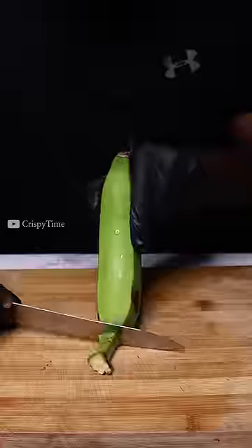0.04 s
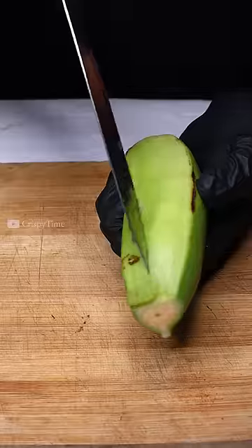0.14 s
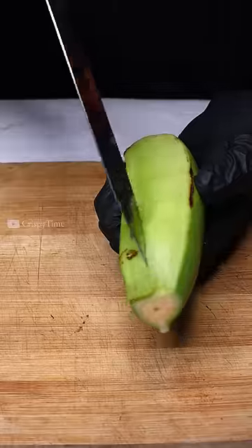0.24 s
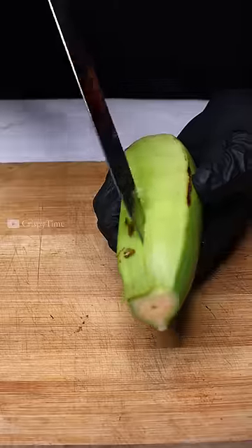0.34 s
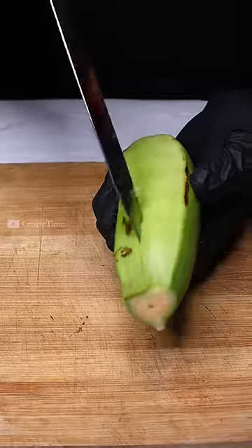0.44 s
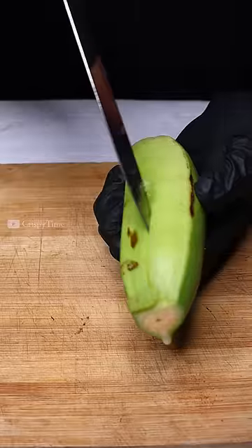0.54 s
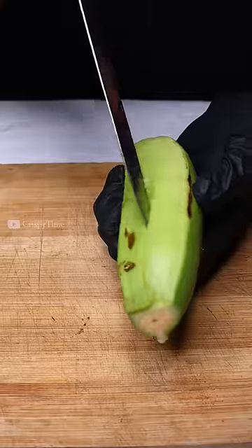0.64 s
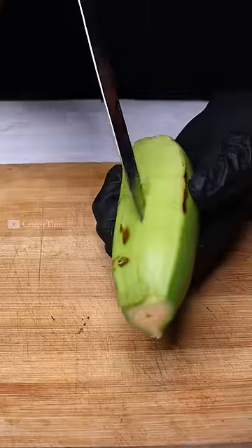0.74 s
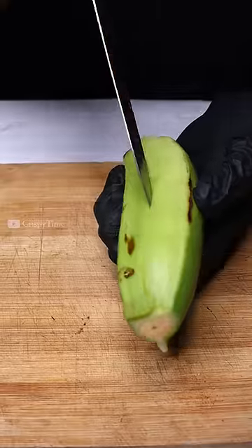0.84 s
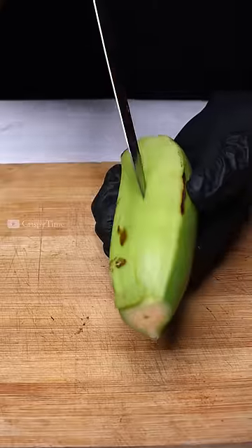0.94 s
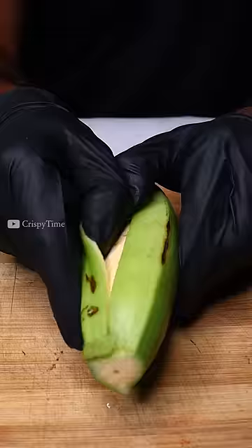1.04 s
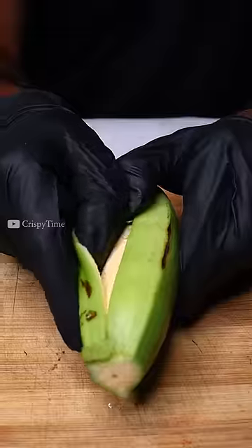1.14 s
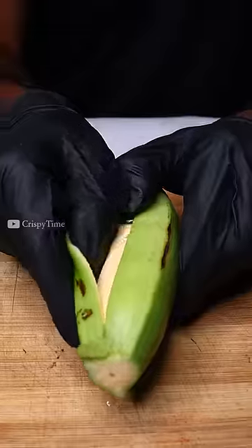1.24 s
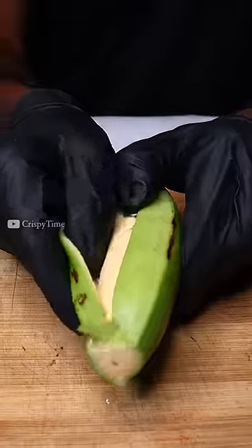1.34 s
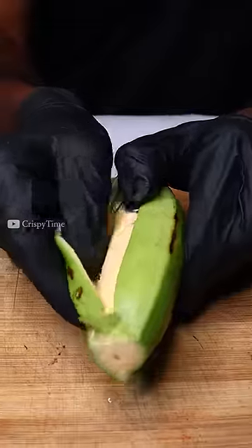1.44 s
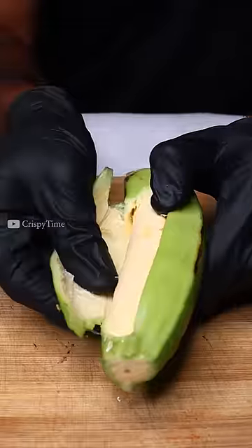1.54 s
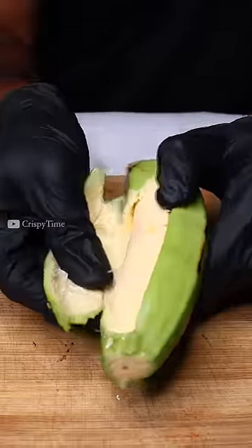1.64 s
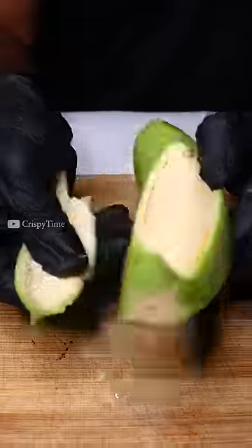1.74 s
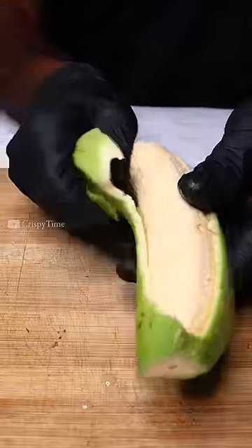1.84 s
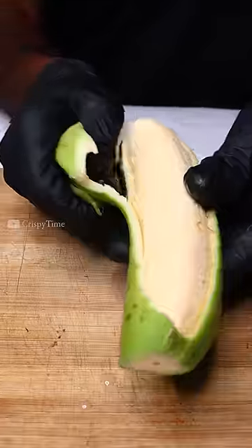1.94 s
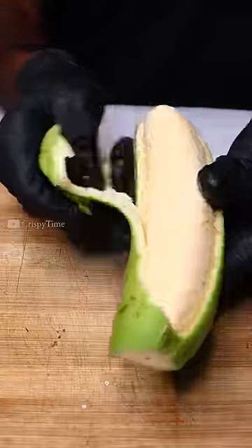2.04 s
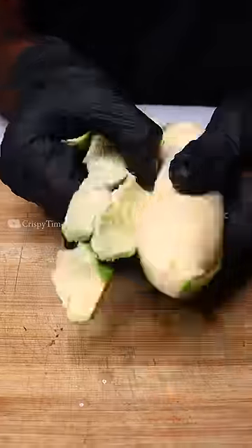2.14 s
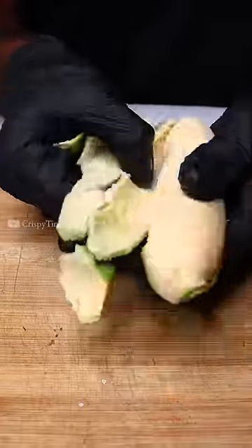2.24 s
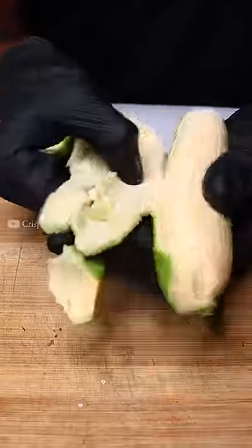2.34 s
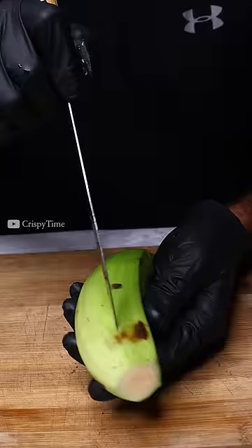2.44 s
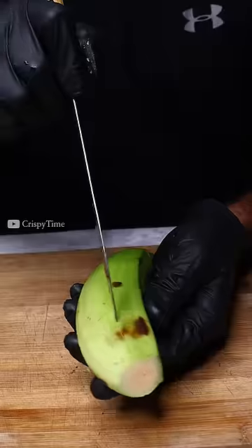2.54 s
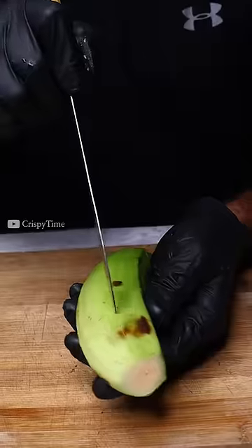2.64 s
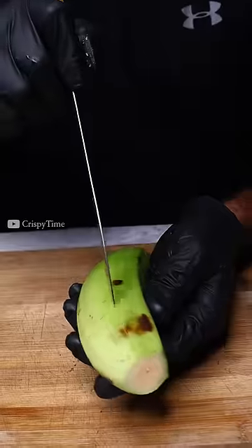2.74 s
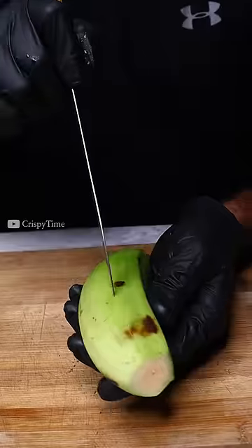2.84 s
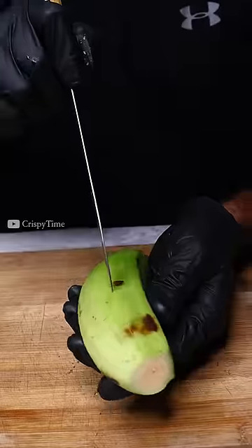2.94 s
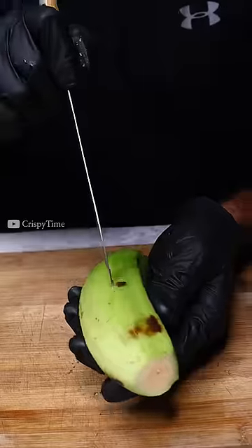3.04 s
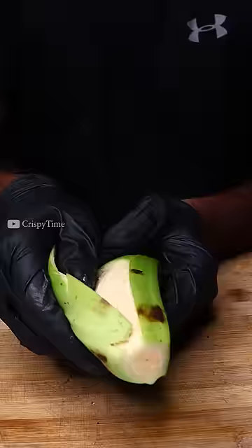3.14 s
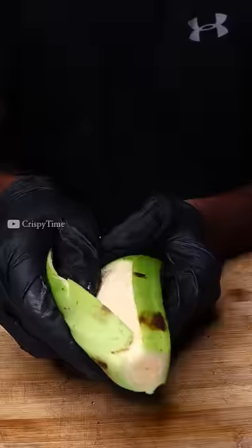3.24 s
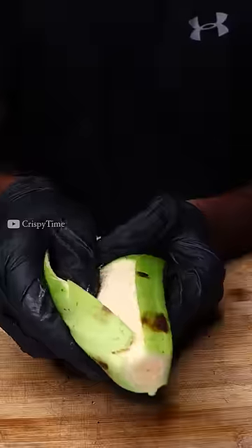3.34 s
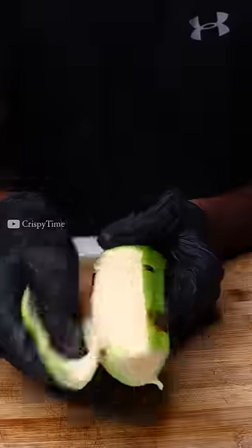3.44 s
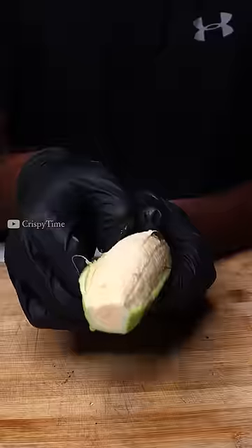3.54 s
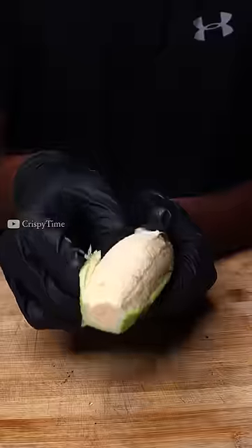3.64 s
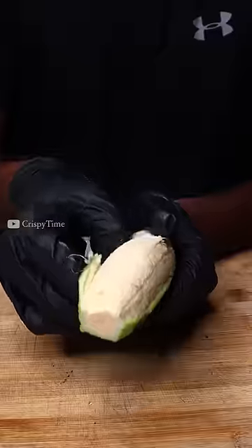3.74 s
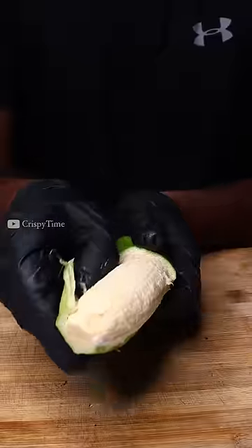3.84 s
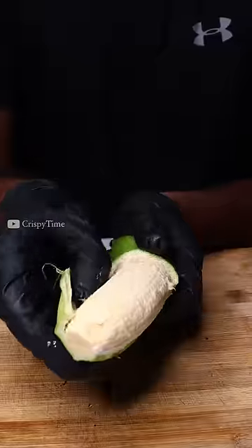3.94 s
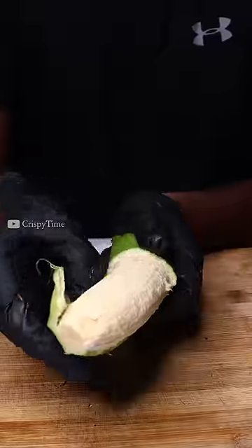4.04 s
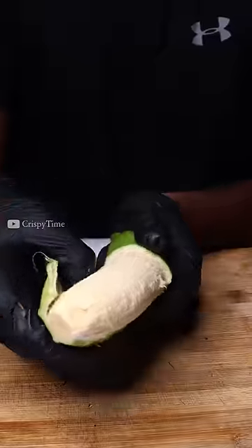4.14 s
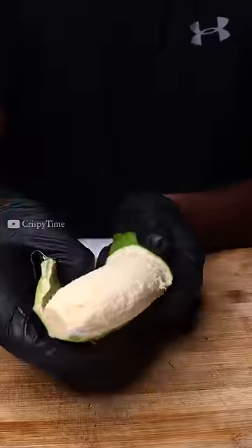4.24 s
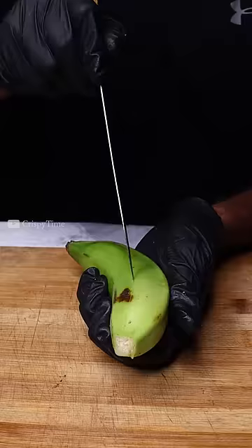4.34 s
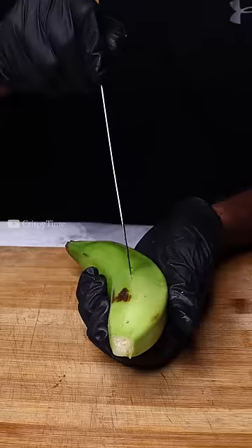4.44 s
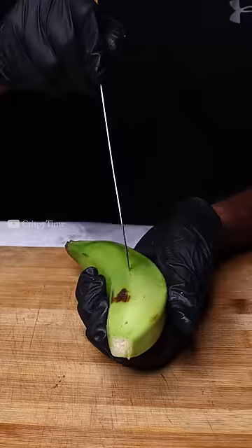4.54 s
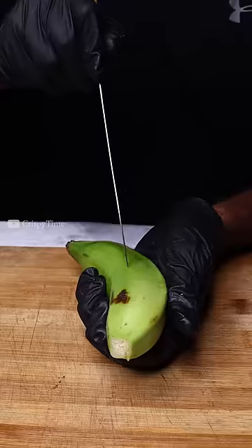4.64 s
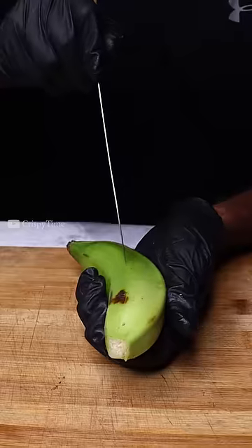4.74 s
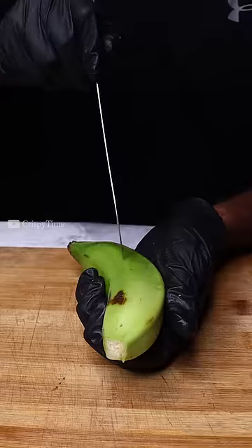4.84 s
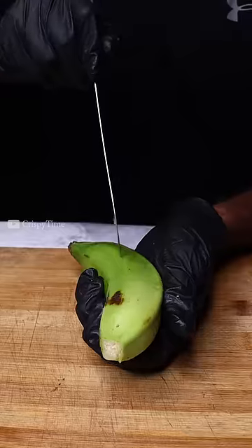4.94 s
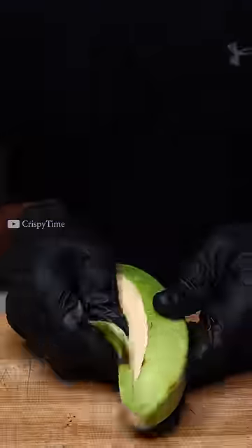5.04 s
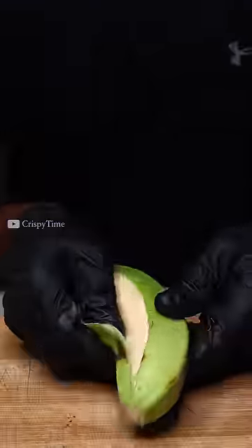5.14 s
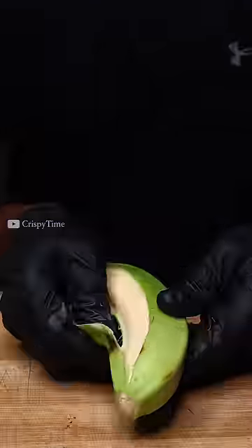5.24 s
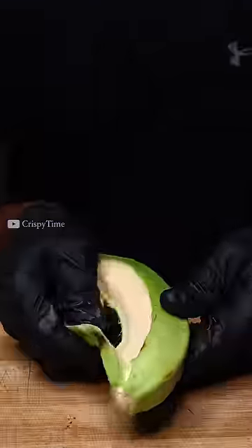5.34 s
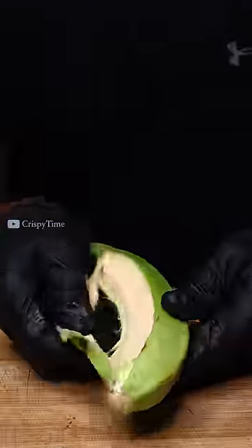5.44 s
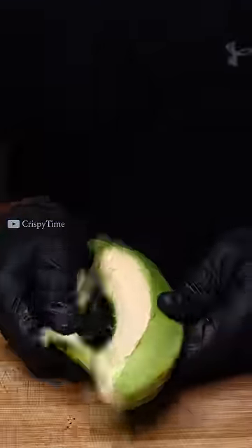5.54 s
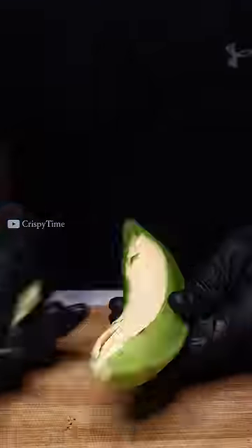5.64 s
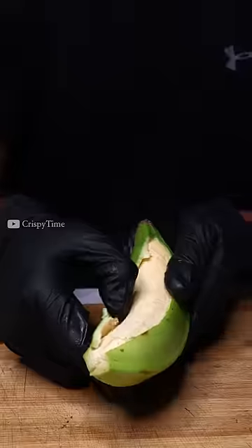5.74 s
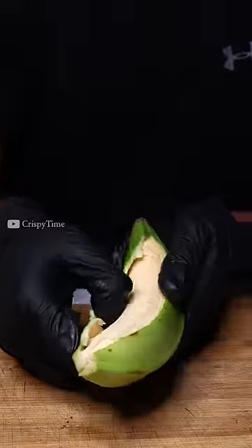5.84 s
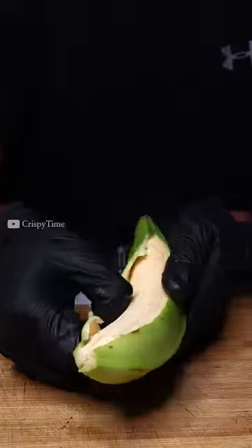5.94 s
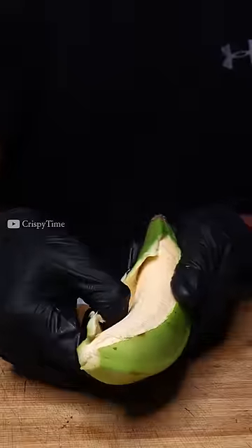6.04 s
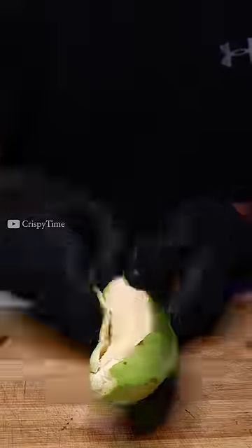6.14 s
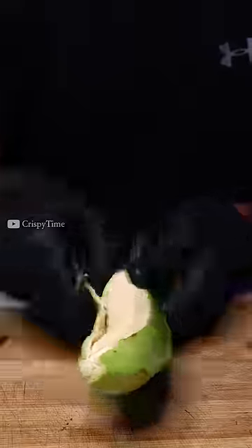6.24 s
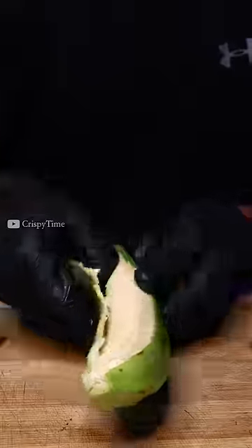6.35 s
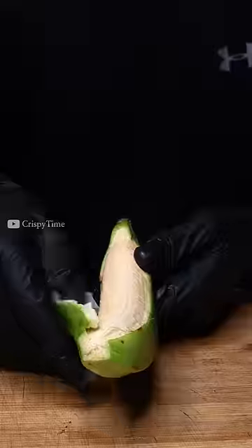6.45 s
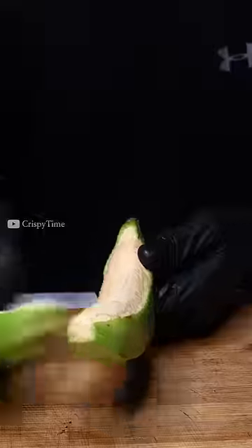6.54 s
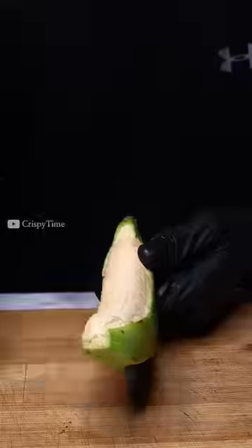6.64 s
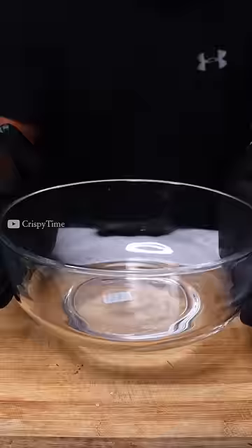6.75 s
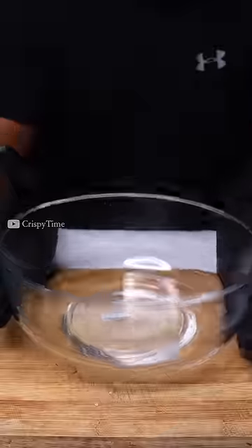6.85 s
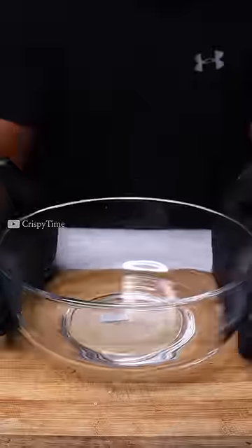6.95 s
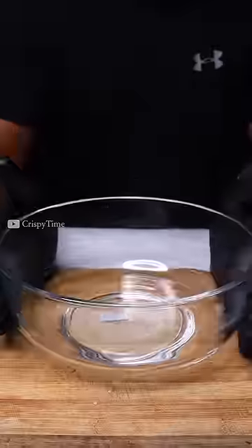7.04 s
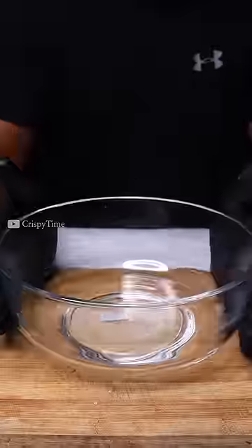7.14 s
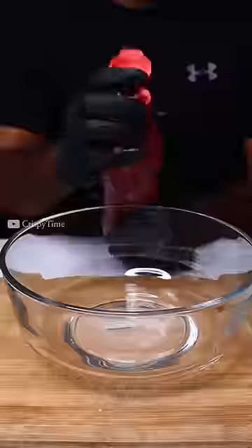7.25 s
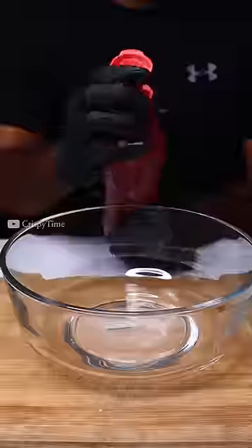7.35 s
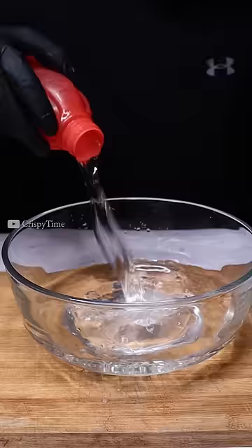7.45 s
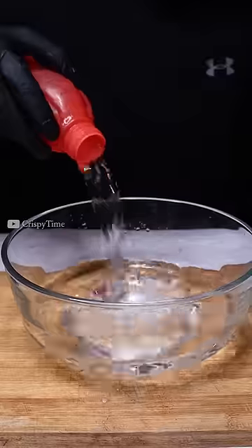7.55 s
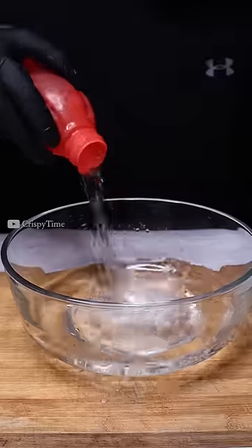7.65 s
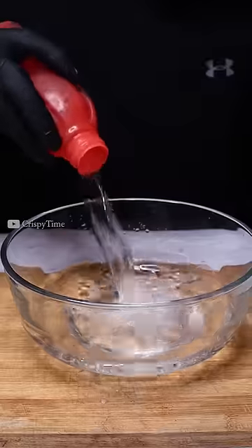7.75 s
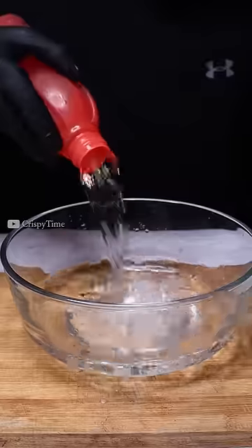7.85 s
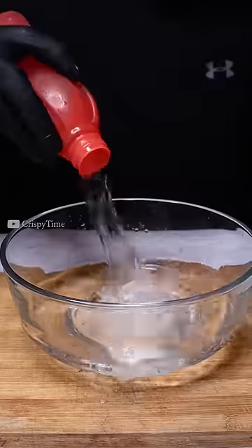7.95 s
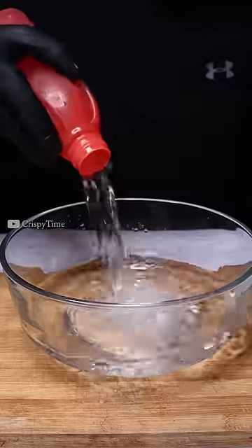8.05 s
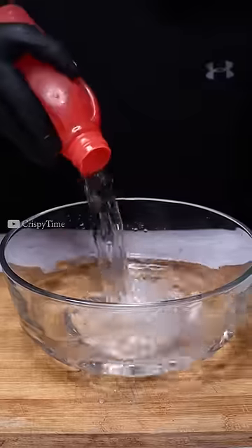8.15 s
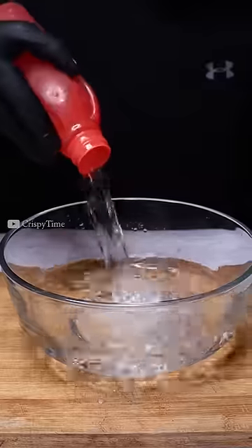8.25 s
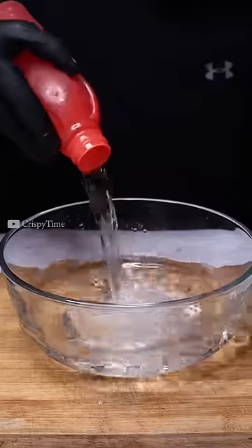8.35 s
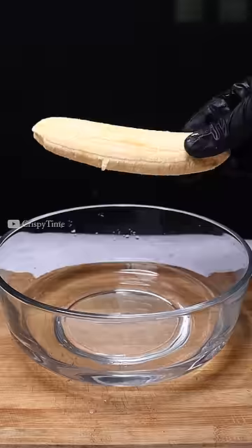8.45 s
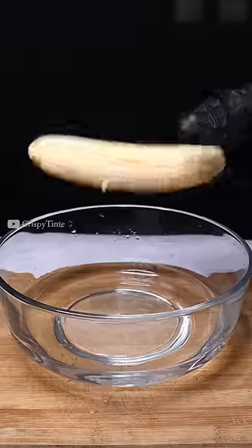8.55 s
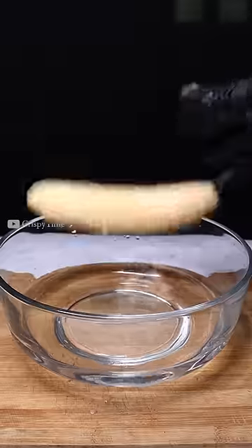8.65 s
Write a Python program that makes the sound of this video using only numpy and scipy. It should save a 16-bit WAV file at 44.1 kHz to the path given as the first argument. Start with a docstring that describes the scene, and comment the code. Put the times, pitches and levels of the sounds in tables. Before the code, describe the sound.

One loud chop, a squeaky blade and crisp tearing of banana skin, then a glass bowl set down and water poured in.

```python
"""One chop lands on a wooden board in a small kitchen. Gloved hands then slit green bananas three times, the
blade dragging and squeaking, and after each slit pull off the skin, which crackles and snaps. At 3.2 s the
knife tip pops out. Near 7 s a glass bowl is set on the board, a bottle cap pops, and water is poured,
splashing, bubbling and ringing the glass. The sound comes in short stretches, and each one stops abruptly, echo
and all."""
import sys
import numpy as np
from scipy import signal
from scipy.fft import rfft, irfft
from scipy.io import wavfile
from scipy.ndimage import uniform_filter1d

SR = 44100
rng = np.random.default_rng(int(sys.argv[2]) if len(sys.argv) > 2 else 0)


def master_out(mix):
    """Clip the mix to full scale and print it as 16-bit PCM to the path in sys.argv[1]."""
    frames = np.transpose(np.atleast_2d(mix))
    ceiling = np.clip(frames, -1, 1)
    pcm = np.round(ceiling * 32767).astype(np.int16)
    wavfile.write(sys.argv[1], SR, pcm)


N = 383229
TIME = np.arange(N) / SR


def gain_of(db):
    """Turns decibels into a factor to multiply by."""
    return 10 ** (np.asarray(db) / 20)


def unit_power(x):
    """Scales a sound to an average power of 1."""
    return x / np.sqrt(np.mean(x ** 2) + 1e-20)


def value_at(points, hz):
    """Looks up a value between rows of (Hz, value), on a log-frequency axis."""
    known_hz, value = np.transpose(points)
    return np.interp(np.log(hz + 1), np.log(known_hz + 1), value)


def add(mix, s, sound):
    """Mixes a sound in at s seconds."""
    part = mix[round(s * SR):][:len(sound)]
    part += sound[:len(part)]


def click(colour, lo_hz=10, hi_hz=20000):
    """A sharp click with the given tone colour, fading below lo_hz and above hi_hz."""
    hz = abs(np.fft.fftfreq(4096, 1 / SR)) + 1
    edges = np.sqrt((1 + (lo_hz / hz) ** 8) * (1 + (hz / hi_hz) ** 12))
    log_gain = np.log(gain_of(value_at(colour, hz)) / edges + 1e-6)
    phase = -signal.hilbert(log_gain).imag  # packs the energy at the start
    taps = np.fft.ifft(np.exp(log_gain + 1j * phase)).real[:2048]
    return taps / np.linalg.norm(taps)


def level_curve(times, db):
    """A gain that passes through the given levels and is silent outside them."""
    return gain_of(np.interp(TIME, times, db)) * (TIME > times[0] - .004) * (TIME < times[-1] + .004)


def swells(rows, rise_s, fall_s):
    """A gain that climbs to each peak (seconds, dB) and dies away after it."""
    out, t = np.zeros(N), np.arange(-SR // 8, SR // 3) / SR
    shape = np.exp(np.where(t < 0, t / rise_s, -t / fall_s))
    for s, db in rows:
        add(out, s + t[0], gain_of(db) * shape)
    return out


def grains(per_s, spread_db):
    """Tiny clicks at random moments; a few are large."""
    sizes = gain_of(spread_db * np.minimum(rng.exponential(1, N), 4))
    return unit_power(sizes * rng.standard_normal(N) * (rng.random(N) < per_s / SR))


def ring(hz, t60, glide=0., size=SR // 2):
    """A tone that may slide in pitch; its ring time t60 is the seconds it takes to fall 60 dB."""
    t = np.arange(size) / SR
    return gain_of(-60 * t / t60) * np.sin(2 * np.pi * hz * (t + glide * t ** 2 / t60))


def resonate(x, peaks):
    """Lets a sound ring an object's notes, each given as (Hz, width in Hz, dB)."""
    return sum(gain_of(db) * signal.lfilter(*signal.iirpeak(hz, hz / width, SR), x)
               for hz, width, db in peaks)


def moving_resonance(x, hz, width_hz):
    """A resonance that follows the pitch curve hz: shift down, smooth, shift back."""
    turn = np.exp(2j * np.pi * np.cumsum(hz) / SR)
    keep = np.exp(-np.pi * width_hz / SR)
    return 2 * (turn * signal.lfilter([1 - keep], [1, -keep], x / turn)).real


def squeeze(x, knee_db, hold_s):
    """Turns down whatever is louder than knee_db, so a blow's echo stands out more."""
    keep = np.exp(-1 / (hold_s * SR))
    power_db = 10 * np.log10(signal.lfilter([1 - keep], [1, -keep], (x ** 2).mean(0)) + 1e-12)
    return x / gain_of(np.maximum(power_db - knee_db, 0))


# How alike the room sounds left and right. Each row: frequency in Hz, likeness from 0 to 1.
LIKENESS = [(60, 1), (400, 0.84), (1000, 0.64), (2400, 0), (8000, 0.22)]
def stereo_pair(spectra):
    """Blends two unrelated noises into left and right, most alike in the bass."""
    same = value_at(LIKENESS, np.linspace(0, SR / 2, spectra.shape[1]))[:, None]
    return np.array([spectra[0], same * spectra[0] + np.sqrt(1 - same ** 2) * spectra[1]])


# The tone colour of the quiet room. Each row: frequency in Hz, level in dB.
AIR_COLOUR = [(53, -44), (90, -9), (197, -12), (268, -6.5), (493, -13.5), (613, -12), (948, -15.5),
              (1990, -15.5), (2530, -20), (3290, -16), (14500, -26.5), (15400, -26), (16500, -45)]
def air():
    """The quiet hiss and rumble of the kitchen."""
    hz, _, noise = signal.stft(rng.standard_normal((2, N)), SR, nperseg=2048)
    coloured = stereo_pair(noise) * gain_of(value_at(AIR_COLOUR, hz))[:, None]
    return gain_of(-56.5) * unit_power(signal.istft(coloured, SR)[1][:, :N])


# Bumps of the counter. Each row: time in seconds, level in dB.
BUMPS = [(.62, -56), (1.41, -53), (1.77, -44), (2.12, -70), (2.77, -63), (3.47, -46), (3.71, -55),
         (3.92, -55), (4.6, -61), (4.9, -53), (5.14, -55), (5.7, -45.5), (6.38, -49), (7.65, -58),
         (7.95, -43), (8.2, -60.5)]
def counter_rumble():
    """Dull low noise carried by the counter, swelling at each bump."""
    band = signal.butter(3, [42, 150], "band", fs=SR, output="sos")
    level = gain_of(-68) + swells(BUMPS, rise_s=0.016, fall_s=0.032)
    return level * unit_power(signal.sosfilt(band, rng.standard_normal(N)))


# How long the kitchen echoes. Each row: frequency in Hz, ring time in seconds.
ECHO_TIMES = [(100, 0.56), (400, 0.38), (1000, 0.47), (2500, 0.42), (6000, 0.4), (14000, 0.24)]
def kitchen_echo(tail_db, right_delay):
    """Direct sound (right_delay samples later on the right), scatter off board and hands, then a tail."""
    hz, t, noise = signal.stft(rng.standard_normal((2, SR * 2 // 5)), SR, nperseg=256)
    decay = gain_of(-60 * t / value_at(ECHO_TIMES, hz)[:, None])
    tail = signal.istft(stereo_pair(noise) * decay, SR, nperseg=256)[1]
    age = np.arange(tail.shape[1]) / SR
    scatter = tail * np.exp(-age / 0.0011) * (age > .0002)
    tail *= 1 - np.exp(-age / 0.0018)
    echo = gain_of(tail_db) * tail / np.linalg.norm(tail[0])
    echo += gain_of(1.5) * scatter / np.linalg.norm(scatter[0])
    echo[[0, 1], [0, right_delay]] += 1
    return echo / np.linalg.norm(echo[0])


# The notes of the wooden board. Each row: pitch in Hz, level in dB, ring time in seconds.
BOARD_NOTES = [(104.2, -26.5, 0.71), (139, -28, 0.76), (198, -8, 0.76), (241.3, -7, 0.77),
               (324, -12.5, 0.42), (396, -13, 0.57), (562, -18, 0.56)]
# The tone colours of the chop, the bowl and the cap. Each row: frequency in Hz, level in dB.
CHOP_TONE = [(24, -57), (40, 1), (156, -17), (196, -2.5), (293, -7.5), (564, -2.5), (623, -12.5),
             (2090, -1.5), (4120, -7.5), (5580, -18.5), (14500, -28), (16500, -59)]
BOWL_TONE = [(24, -75), (40, -32.5), (239, -4.5), (285, -13.5), (550, -11), (672, -15), (1990, -16.5),
             (5440, -35), (16500, -99)]
CAP_TONE = [(59, -81), (100, -52), (186, -15.5), (684, -11), (1000, -3), (1510, -19), (3540, -17),
            (13600, -31), (15500, -33), (16500, -34.5)]
# The three blows. Each row: start in seconds, strength in dB, board ring in dB on top of that, colour.
BLOWS = [(0.0011, 54, -45, CHOP_TONE), (6.953, 34, -32.5, BOWL_TONE), (7.291, 14.7, -49.5, CAP_TONE)]
def blow(s, db, ring_db, colour, first, last):
    """A hard contact fills the kitchen while the board rings close by; heard from sample first to last."""
    contact, board = np.zeros(N), np.zeros(N)
    add(contact, s, gain_of(db) * click(colour, lo_hz=88))
    notes = sum(gain_of(note_db) * ring(hz, t60) for hz, note_db, t60 in BOARD_NOTES)
    add(board, s, gain_of(db + ring_db) * notes)
    echo = kitchen_echo(tail_db=10.5, right_delay=0)
    return signal.fftconvolve(contact[None, first:last], echo, axes=1)[:, :last - first] + board[first:last]


# The strength of the stream. Each row: time in seconds, level in dB.
FLOW = [(7.488, -36.5), (7.554, -44.5), (7.57, -35.5), (7.602, -37.5), (7.634, -29.5), (7.804, -40),
        (7.948, -34), (8.026, -39.5), (8.034, -34), (8.178, -38.5), (8.228, -33), (8.254, -37), (8.37, -36),
        (8.452, -39.5)]
# The tone colour of the splash. Each row: frequency in Hz, level in dB.
SPLASH_COLOUR = [(180, -43), (300, -27), (427, -21), (671, -11), (742, -5.5), (1150, -10), (1430, -9),
                 (1990, -10.5), (2360, -3.5), (2700, -6.5), (7130, -12.5), (14900, -20.5), (16500, -36)]
# The notes of the bowl. Each row: pitch in Hz, width in Hz, level in dB.
GLASS_NOTES = [(740, 40, -14), (1550, 51, -5), (2300, 159, -6), (2934, 31, 11), (3500, 54, -6),
               (5120, 63, -12)]
# Water slapping the glass. Each row: start in seconds, level in dB, droplet pitch in Hz.
WATER_SLAPS = [(7.4854, -31, 7360), (7.5447, -42, 7160), (7.5692, -25, 6540), (7.6315, -13, 5900),
               (7.64, -11, 6940), (7.7004, -21, 5350), (7.8106, -30, 5430), (7.8336, -21, 5300),
               (7.853, -34, 2920), (7.9039, -29, 3180), (7.9378, -17.5, 5750), (8.0356, -19, 3360),
               (8.0501, -16, 3600), (8.1628, -38, 3570), (8.1868, -36, 3440), (8.2207, -15, 4940),
               (8.3364, -26, 3470), (8.3714, -38, 3900), (8.4108, -26, 2820)]
# Gulps from the bottle thumping on the bottom. Each row: time in seconds, level in dB.
GULPS = [(7.49, -54), (7.63, -34.5), (7.77, -53), (7.935, -24.5), (7.975, -31), (8.05, -54)]
# Big bubbles, then drops ringing the rim.
# Each row: start in seconds, level in dB, pitch in Hz, ring time in seconds.
BIG_BUBBLES = [(7.494, -26, 1540, 0.044), (7.552, -28, 733, 0.18), (7.693, -21, 1524, 0.04),
               (7.709, -28.5, 731, 0.25), (7.758, -24.5, 610, 0.11), (7.809, -22, 749, 0.14),
               (7.87, -30, 760, 0.1), (7.88, -36, 1470, 0.1), (8.04, -33.5, 374, 0.21),
               (8.083, -32, 844, 0.067), (8.164, -27, 917, 0.1), (8.229, -31.5, 753, 0.19),
               (8.288, -26.5, 1377, 0.052), (8.412, -23.5, 878, 0.079), (8.44, -32, 647, 0.06),
               (8.443, -35.5, 980, 0.074)]
RIM_PINGS = [(7.4864, -25, 2170, 0.049), (7.5697, -19, 2400, 0.024), (7.6444, -18, 2660, 0.021),
             (7.6999, -26, 2330, 0.05), (7.8346, -24, 2340, 0.03), (7.8526, -27, 2930, 0.027),
             (7.9234, -26, 2380, 0.044), (8.0356, -26.5, 2420, 0.044), (8.2043, -25, 2270, 0.061),
             (8.2222, -14.5, 2380, 0.049), (8.313, -27, 2290, 0.05), (8.3444, -22, 2120, 0.03),
             (8.3744, -20.5, 2315, 0.062)]
def water():
    """Droplets ring the glass, the falling water thumps the board, and bubbles chirp upward."""
    start, end = FLOW[0][0], FLOW[-1][0]
    drops = level_curve(*np.transpose(FLOW)) * grains(per_s=7800, spread_db=4.5)
    for s, db, _ in WATER_SLAPS:
        add(drops, s, gain_of(db - 2.5) * rng.standard_normal(40) * np.exp(-np.arange(40) / 4.3))
    splash = signal.oaconvolve(drops, click(SPLASH_COLOUR))[:N]
    out = splash + gain_of(-14) * resonate(splash, GLASS_NOTES)
    for s, db, hz in WATER_SLAPS:
        add(out, s, gain_of(db + 1.5) * ring(hz, t60=49 / hz, glide=0.073, size=2000))
    board = [(hz, 70, db) for hz, db, _ in BOARD_NOTES]
    weight = (gain_of(-59.5) + swells(GULPS, rise_s=0.0063, fall_s=0.032)) * (TIME > start)
    patter = grains(per_s=330, spread_db=0.5)
    out += weight * unit_power(resonate(resonate(patter, board), board))
    attack = 1 - np.exp(-np.arange(9000) / 21.4)
    for s, db, hz, t60 in BIG_BUBBLES + RIM_PINGS:
        # the level wavers as the surface keeps breaking
        churn = 1 + 0.45 * unit_power(uniform_filter1d(rng.standard_normal(9000), 250))
        add(out, s, gain_of(db) * churn * attack * ring(hz, t60, glide=0.026, size=9000))
    for when, pitch, strength in rng.random((120, 3)):  # small bubbles
        hz = 1300 * 4.6 ** pitch
        bubble = ring(hz, t60=34 / hz, glide=0.19, size=3000)
        add(out, start + when * (end - start), gain_of(-47.5 + 17 * strength) * bubble)
    return out


# Cuts along the skin. Each row: start and end in seconds, steady drag in dB, pitch of the slit in Hz.
SKIN_SLITS = [(.165, 1.11, -88, 2170), (2.48, 3.196, -63, 1670), (4.35, 5.073, -52, 1950)]
# Jerks of the blade. Each row: time in seconds, level in dB, length in seconds, squeak pitch in Hz.
BLADE_JERKS = [(0.185, -34.5, 0.021, 2240), (0.344, -17.5, 0.0051, 2380), (0.591, -17.5, 0.0014, 2220),
               (0.621, -28, 0.02, 2190), (0.859, -21, 0.018, 2210), (2.519, -26.5, 0.004, 3370),
               (2.534, -17.5, 0.004, 3290), (2.719, -32, 0.006, 3500), (2.734, -18, 0.0067, 3630),
               (2.886, -22, 0.015, 3230), (2.917, -32, 0.0022, 1925), (2.946, -27, 0.015, 3270),
               (3.064, -25, 0.017, 1840), (3.14, -28.5, 0.014, 1810), (4.384, -28.5, 0.011, 3380),
               (4.452, -34, 0.011, 3800), (4.498, -23.5, 0.0041, 3400), (4.574, -25, 0.0035, 3470),
               (4.622, -41, 0.0094, 2200), (4.691, -35, 0.027, 2230), (4.737, -36, 0.0066, 2250),
               (4.778, -33.5, 0.003, 2360), (4.813, -33.5, 0.0037, 1600), (4.839, -36, 0.0061, 1920),
               (4.873, -25.5, 0.0051, 2170), (4.921, -24.5, 0.0035, 3290), (5.008, -31, 0.0058, 1800),
               (5.037, -35.5, 0.011, 2010)]
# The tone colour of the scraping blade. Each row: frequency in Hz, level in dB.
BLADE_COLOUR = [(180, -44), (300, -18), (326, -16.5), (848, -21.5), (1150, -13.5), (1360, -14), (1870, -3),
                (2320, -7.5), (3300, -3), (5930, -12), (7760, -7), (10700, -16.5), (13900, -13.5),
                (15700, -16.5), (16500, -37)]
def knife():
    """Gritty rubbing that swells at each jerk of the blade and squeaks in the slit."""
    jerks, t = np.array(BLADE_JERKS), np.arange(3000) / SR
    force = gain_of(-19) * swells(jerks[:, :2], rise_s=0.0044, fall_s=0.015)  # slides on and slows
    for s, db, length, _ in BLADE_JERKS:
        progress = t / max(length, .002)
        add(force, s - .004, gain_of(db - 14) * progress * np.exp(1 - progress))
    drag = sum(level_curve((start, end), (db, db)) for start, end, db, _ in SKIN_SLITS)
    force = (force + drag) * (drag > 0)
    grit = signal.oaconvolve(force * grains(per_s=12000, spread_db=1), click(BLADE_COLOUR))[:N]
    jerk_s, _, _, squeak_hz = jerks.T
    latest_jerk = np.maximum(np.searchsorted(jerk_s, TIME + 0.015) - 1, 0)
    squeak = moving_resonance(grit, squeak_hz[latest_jerk], width_hz=59)
    _, ends, _, slit_hz = np.transpose(SKIN_SLITS)
    slit = moving_resonance(grit, slit_hz[np.searchsorted(ends[:-1], TIME)], width_hz=120)
    return grit + gain_of(9.5) * squeak + gain_of(-0.5) * slit


def tip_pop():
    """The knife tip springs out of the skin with a hollow ring and a knock."""
    hollow = ring(hz=900, t60=0.021, glide=-0.023, size=2000)
    knock = ring(hz=1350, t60=0.0066, size=2000)
    attack = 1 - np.exp(-TIME[:2000] / 0.00072)
    out = np.zeros(N)
    add(out, s=3.1846, sound=gain_of(-4.5) * (hollow + 2.3 * knock) * attack)
    return out


# Skin tearing from the flesh, one list for each pull. Each row: time in seconds, force in dB,
# then the dB added to that force for the hollow under the skin and for the glove.
SKIN_PULLS = [
    [(1.1, -37, -7.5, 1.5), (1.37, -40.5, -2.5, 8), (1.406, -28, 5.5, 0), (1.502, -45, -2, 6.5),
     (1.706, -42, 2, 2), (1.726, -77, 8, 1), (1.732, -17.5, 1, 0), (1.826, -77, 6, 2)],
    [(1.834, -51, 2.5, -2), (1.884, -35, -3, -4), (1.908, -47, -5, -1), (1.948, -36, -2, 4),
     (2.022, -42, 2.5, 1), (2.042, -46, -4, 14), (2.11, -33, -1, 3), (2.178, -32, 6, 2)],
    [(2.186, -33, -11, 4), (2.2, -40.5, -5, 5), (2.306, -34, 0.5, 10.5), (2.346, -33.5, -0.5, 6),
     (2.386, -41, 0, 2), (2.398, -24.5, -1, 7), (2.438, -22, 1.5, 0), (2.479, -50, 5, 0)],
    [(3.202, -37.5, 0.5, 4), (3.302, -48, -1, 1), (3.308, -34.5, -3.5, 6), (3.358, -46, -3, 2),
     (3.462, -46.5, 5, 4), (3.47, -25, 10, 1), (3.484, -26, 1, 7), (3.531, -40, 6, 1)],
    [(3.539, -47, -5, 7), (3.593, -40.5, -3, 3), (3.639, -45, -1, 7), (3.681, -34, -9, -2),
     (3.695, -16, -1, -3.5), (3.733, -36.5, 4.5, -2), (3.857, -57, 5, -6), (3.862, -47.5, -5, 1)],
    [(3.868, -31.5, 5, 6), (3.88, -26, -3, 0), (3.914, -40, -1, 7), (3.936, -34.5, -8, 1),
     (4.068, -39, 5, 1), (4.1, -33, -2, 0), (4.332, -37, 0, 0), (4.346, -41, -1, 2)],
    [(5.088, -39.5, 5, 5), (5.106, -29, 0.5, -5), (5.21, -48.5, 1, 5), (5.262, -39.5, 3.5, 3.5),
     (5.468, -41, 2.5, 3.5), (5.482, -30.5, 3.5, 5.5), (5.596, -52, 4, 0), (5.606, -51, -1, 2)],
    [(5.612, -32.5, 2, 2), (5.628, -41, 3, 8), (5.638, -24, 5, -8), (5.65, -32.5, 4, 0),
     (5.731, -46, 0.5, -4)],
    [(5.739, -50, 3, -6), (5.813, -57, 4, 1), (5.847, -31.5, -2, 2), (5.985, -38, -1, -3),
     (5.997, -30, -4, -1), (6.083, -43, 1, 4), (6.089, -39, 0, -3), (6.148, -44, 5, -3)],
    [(6.156, -49, -3, -1), (6.172, -52, -9, 0), (6.186, -27.5, -5.5, -0.5), (6.25, -58.5, 1, 4),
     (6.272, -34, -7, 1), (6.31, -35, -8, 1), (6.326, -24.5, 1.5, 3), (6.433, -43, -7, -14)],
    [(6.538, -46, -1, -8), (6.544, -52, 3, -6), (6.566, -35, 7, 3), (6.618, -32, -1.5, 7.5),
     (6.666, -52, 4, 3)],
]
# Clear snaps of the skin.
# Each row: time in seconds, crack in dB, pitch of the loose flap in Hz, flap in dB, wet tick in dB.
SKIN_SNAPS = [(1.1024, -30.5, 2180, -60, -16.5), (1.1544, -18, 3030, -47, -22),
              (1.185, -20.5, 1970, -39, -19), (1.288, -29, 2370, -37, -21), (1.3558, -16.5, 2550, -30, -24),
              (1.3995, -16, 2430, -11, -6), (1.4306, -35, 1890, -26, -34.5), (1.4466, -18, 2250, -17, -28),
              (1.5209, -22, 1900, -30, -32), (1.568, -12, 2240, -15, -16), (1.6115, -19, 2180, -7.5, -19),
              (1.663, -13, 2400, -27, -19.5), (1.695, -11, 2100, -9, -20), (1.704, -38, 1800, -12, -20),
              (1.734, -5.5, 956, -11, -23.5), (1.7584, -34.5, 1980, -13.5, -15),
              (1.7709, -31, 1100, -17, -11.5), (1.8647, -22, 2320, -42, -33.5),
              (1.881, -12.5, 2110, -31, -20), (1.924, -23, 2670, -44.5, -16),
              (1.941, -12, 1950, -23, -19.5), (1.9567, -18.5, 1880, -25, -20.5),
              (1.9804, -9, 1820, -11, -12), (2.004, -30, 1860, -37, -29), (2.0168, -10, 980, -17.5, -29),
              (2.0572, -33, 1890, -33, -13), (2.072, -23, 1840, -20.5, -5.5), (2.0956, -6, 1880, -13, -16),
              (2.1117, -15, 950, -17, -5), (2.1379, -28.5, 940, -19, -10), (2.1485, -29, 930, -11.5, -25),
              (2.1666, -33, 990, -35, -18), (2.206, -26, 1370, -45, -33.5), (2.2785, -21, 1740, -29, -20),
              (2.2983, -29, 2780, -51, -13), (2.32, -38, 1770, -45, -12), (2.3354, -15, 2300, -37, -15),
              (2.35, -25, 2520, -46, -17), (2.3746, -12.5, 1520, -37, -10), (2.3965, -2, 1480, -18, -10),
              (2.4059, -4, 1700, -18, -9.5), (2.4284, -18, 1670, -18, -13),
              (2.4388, -13, 1250, -14.5, -22.5), (3.2777, -26, 2760, -32, -19.5),
              (3.31, -13.5, 2600, -14.5, -28), (3.3614, -31, 2360, -40, -18), (3.391, -30, 2660, -19, -13),
              (3.4123, -29.5, 2630, -27, -12.5), (3.4477, -32, 2760, -18, -17), (3.47, -30, 2710, -2.5, -6),
              (3.5094, -29.5, 2640, -9.5, -30.5), (3.5704, -33, 2650, -47, -18),
              (3.5972, -26, 2750, -43, -26), (3.6187, -32, 3140, -48, -23), (3.6641, -18.5, 3130, -26, -24),
              (3.694, -6.5, 2380, -14.5, -22.5), (3.7094, -28, 2260, -41, -34),
              (3.8703, -8.5, 1920, -22, -12.5), (3.9324, -19, 2880, -41.5, -18),
              (4.0093, -28.5, 1540, -23.5, -18.5), (4.0721, -29, 966, -32.5, -17),
              (4.0916, -17, 2400, -24.5, -29), (4.1067, -19.5, 1700, -24, -31),
              (4.1415, -16.5, 2080, -31, -15), (4.1604, -27, 2910, -35, -29),
              (4.184, -11.5, 2890, -28, -14), (4.2062, -12.5, 2700, -18, -12), (4.23, -23, 2800, -28, -28),
              (4.2678, -9, 2840, -13, -36), (4.3065, -20, 2900, -19.5, -23),
              (4.3233, -11, 2860, -19, -14.5), (5.0918, -21, 2330, -23, -36), (5.1627, -27, 2940, -24, -30),
              (5.2492, -21, 1340, -27, -25), (5.309, -35, 2180, -29, -46),
              (5.3632, -19.5, 1510, -23.5, -17), (5.3764, -38, 3130, -43, -25),
              (5.3974, -35, 2220, -42, -13), (5.4252, -18.5, 1260, -24, -22), (5.4724, -23, 1700, -29, -30),
              (5.4857, -24.5, 1460, -30.5, -20.5), (5.5154, -34, 1040, -22.5, -22),
              (5.6381, -6.5, 1280, -16.5, -43), (5.8403, -19.5, 2920, -16.5, -27),
              (5.881, -7, 1570, -15.5, -39), (5.9389, -16.5, 2120, -24, -61.5),
              (6.0016, -17, 2630, -18, -31), (6.0294, -20, 1510, -50, -38.5),
              (6.0905, -11.5, 2120, -26, -38), (6.1196, -14, 2300, -18.5, -22),
              (6.1832, -21, 1360, -40, -36), (6.2745, -18.5, 1470, -31, -40), (6.3247, -12, 3070, -40, -21),
              (6.343, -14, 2850, -19.5, -37), (6.564, -23, 2730, -22.5, -29)]
# The tone colour of breaking fibres. Each row: frequency in Hz, level in dB.
FIBRE_COLOUR = [(120, -57), (200, -29), (259, -3.5), (382, -14.5), (715, -13), (943, -5.5), (1130, -4),
                (2160, -2), (3310, -4), (4210, -5), (5350, -9.5), (7880, -4), (10200, -5), (15300, -1),
                (16500, -31)]
def peel():
    """Fibres part in a dense crackle; each snap is a knock of the flap and a spray of cracks."""
    pulls = [np.transpose(pull) for pull in SKIN_PULLS]
    force = sum(level_curve(s, db) for s, db, _, _ in pulls)
    hollow_force = sum(level_curve(s, db + extra) for s, db, extra, _ in pulls)
    glove_force = sum(level_curve(s, db + extra) for s, db, _, extra in pulls)
    snap_s, crack_dbs, flap_hz, flap_dbs, tick_dbs = np.transpose(SKIN_SNAPS)
    shared = grains(per_s=800, spread_db=5.5)

    def crackle(pull, snap_dbs):
        """Small breaks follow the pull, and the skin rips on briefly after each snap."""
        rip = gain_of(-14) * swells(zip(snap_s, snap_dbs), rise_s=.001, fall_s=0.0091) * (force > 0)
        return (pull + rip) * (0.32 * shared + 0.63 * grains(per_s=9000, spread_db=1.5))

    fibres = crackle(gain_of(3.5) * force, crack_dbs)
    hollow = crackle(gain_of(-0.5) * hollow_force, flap_dbs)
    glove = crackle(gain_of(2.5) * glove_force, tick_dbs)
    knocks = np.zeros(N)
    for s, crack_db, hz, flap_db, tick_db in SKIN_SNAPS:
        noise = rng.standard_normal((2, 300))
        spray = noise * abs(noise) * np.exp(-TIME[:300] / 0.00099)
        spray *= gain_of(5.5) / abs(spray).max(1, keepdims=True)
        add(fibres, s, gain_of(crack_db) * spray[0])
        add(glove, s, gain_of(tick_db) * spray[1])
        add(knocks, s, gain_of(flap_db) * ring(hz, t60=14.6 / hz, size=600))
    no_bass = signal.butter(2, 550, "high", fs=SR, output="sos")  # the knocks carry no bass
    knocks = gain_of(5) * signal.sosfilt(no_bass, knocks)
    board = gain_of(5.5) * resonate(hollow, [(hz, 45, db) for hz, db, _ in BOARD_NOTES])  # pulls shake it
    cracks = signal.oaconvolve(fibres, click(FIBRE_COLOUR, lo_hz=3700, hi_hz=8100))[:N]
    body = signal.oaconvolve(hollow, click(FIBRE_COLOUR, lo_hz=730, hi_hz=5600))[:N]
    ticks = signal.oaconvolve(glove, click(FIBRE_COLOUR, lo_hz=7600))[:N]
    hollow_ring = gain_of(-7.5) * moving_resonance(body, np.interp(TIME, snap_s, flap_hz), width_hz=700)
    return knocks + board + cracks + body + ticks + hollow_ring


# The stretches of sound, with silence in any gaps. Each row: start in seconds, end in seconds.
STRETCHES = [(0, .163), (.163, 1.097), (1.097, 1.83), (1.83, 2.182), (2.182, 2.483), (2.483, 3.184),
             (3.184, 3.199), (3.199, 3.535), (3.535, 3.866), (3.866, 4.35), (4.35, 5.085), (5.085, 5.61),
             (5.61, 5.735), (5.735, 6.152), (6.152, 6.437), (6.535, 6.67), (6.952, 7.237), (7.29, 7.485),
             (7.485, 8.455)]
def scene():
    """Mixes everything; each stretch has its own echo and is cut off at both ends."""
    close = peel() + knife() + tip_pop() + water()
    background = air() + 0.89 * counter_rumble()
    out = np.zeros((2, N))
    turn = np.pi * 13 * TIME
    for start, end in STRETCHES:
        first, last = round(start * SR), round(end * SR)
        size, mix = last - first, background[:, first:last].copy()
        # six echoes blend in turn, so the room sounds smooth, with no fixed ringing pitch
        for k, delay in enumerate((1, 2, 4, 2, 3, 2)):
            share = 0.75 * np.cos(turn[first:last] + k * np.pi / 6) ** 6
            echo = kitchen_echo(tail_db=-2, right_delay=delay)
            mix += signal.fftconvolve((close[first:last] * share)[None], echo, axes=1)[:, :size]
        for s, db, ring_db, colour in BLOWS:
            if start <= s < end:
                mix += squeeze(blow(s, db, ring_db, colour, first, last), knee_db=-19.5, hold_s=0.024)
        fade = np.minimum(np.arange(size, 0, -1) / 60, 1) * np.minimum(np.arange(size) / 20, 1)
        out[:, first:last] = mix * fade
    return out


# How the sound leans to one side. Each row: frequency in Hz, left over right in dB.
LEFT_LEAN = [(60, 3), (180, 2.5), (550, 1), (1650, -2.5), (4970, 5), (15000, 1.5)]
def record(dry):
    """The hands' treble leans left; deep bass is lost, peaks are clipped, and sound stops at 16 kHz."""
    lean = gain_of(value_at(LEFT_LEAN, np.fft.rfftfreq(N, 1 / SR)) / 2)
    aside = irfft(rfft(dry) * [lean, 1 / lean], N)
    placed = np.where(TIME < 6.8, aside, 0.45 * aside + 0.8 * dry)  # the bowl is nearer the middle
    low_cut = signal.butter(2, 40, "high", fs=SR, output="sos")
    clipped = np.clip(signal.sosfilt(low_cut, placed), -1, 1)
    high_cut = signal.firwin(511, 16000, window=("kaiser", 9), fs=SR)
    return signal.oaconvolve(clipped, high_cut[None], "same")


dry = scene()
out = record(dry)
master_out(out)
```